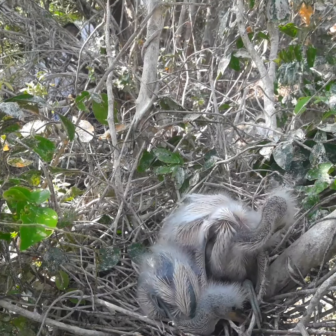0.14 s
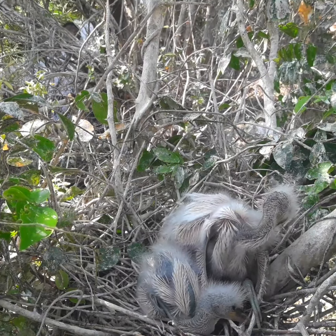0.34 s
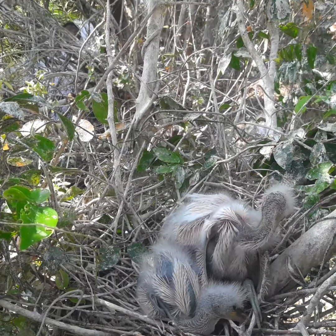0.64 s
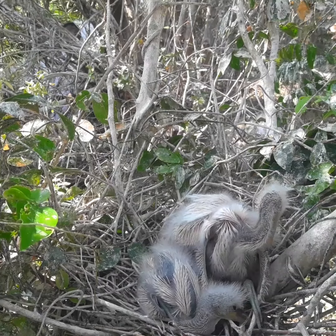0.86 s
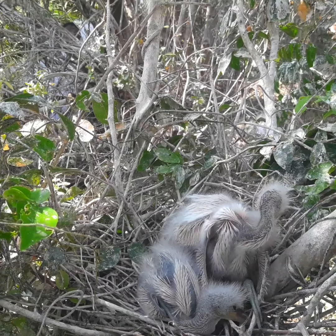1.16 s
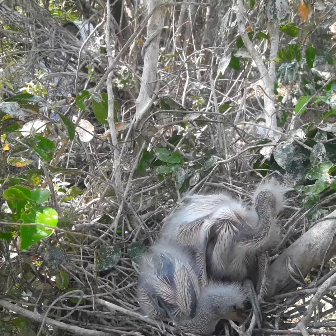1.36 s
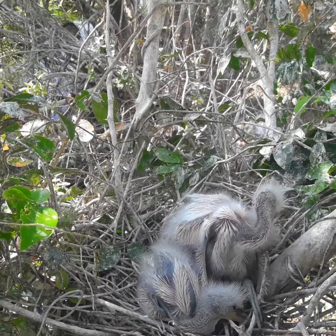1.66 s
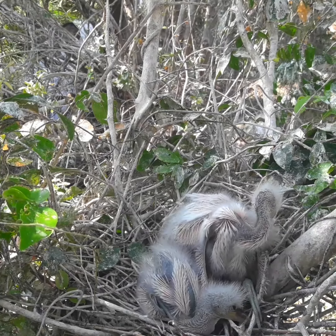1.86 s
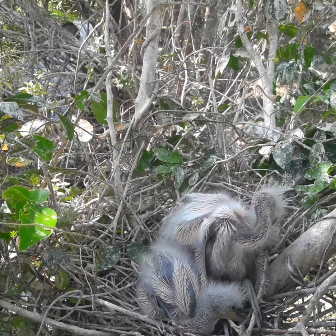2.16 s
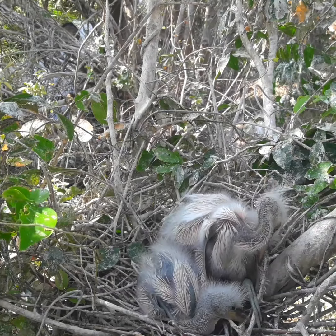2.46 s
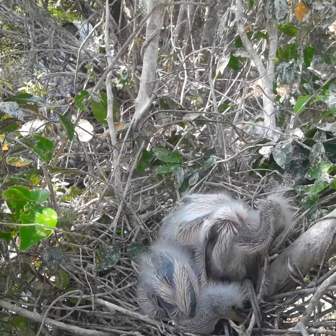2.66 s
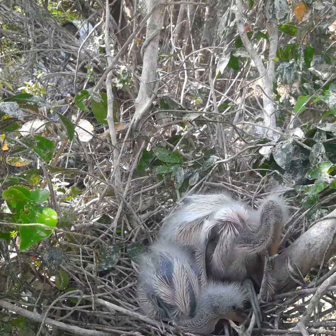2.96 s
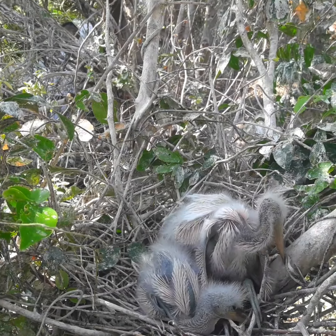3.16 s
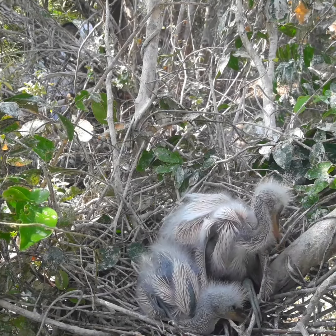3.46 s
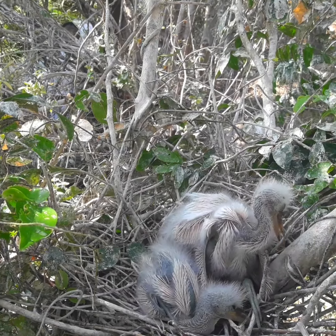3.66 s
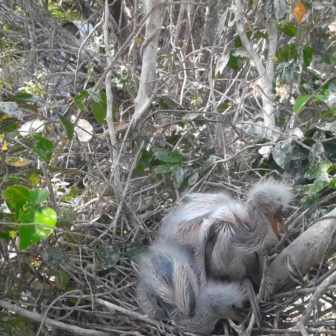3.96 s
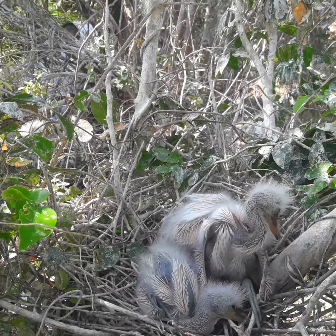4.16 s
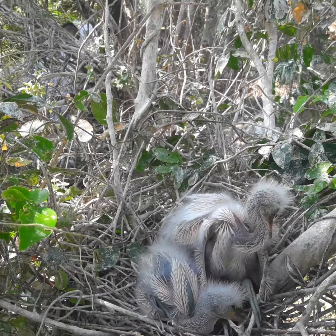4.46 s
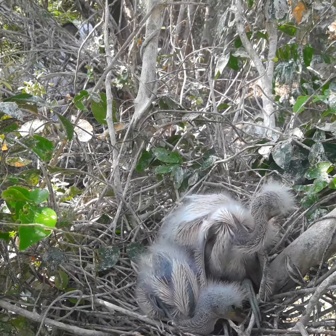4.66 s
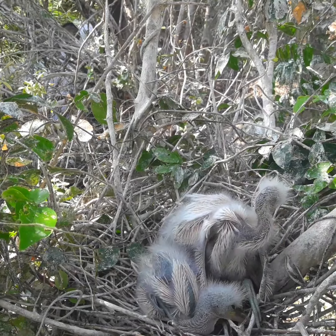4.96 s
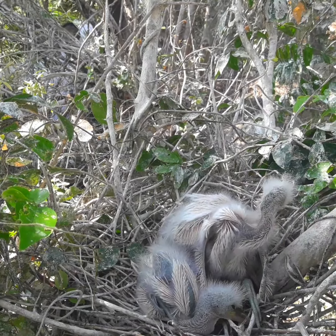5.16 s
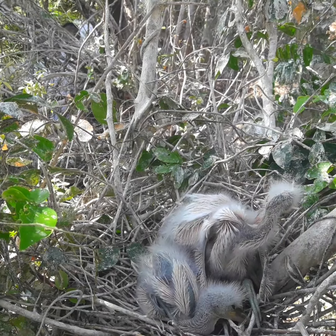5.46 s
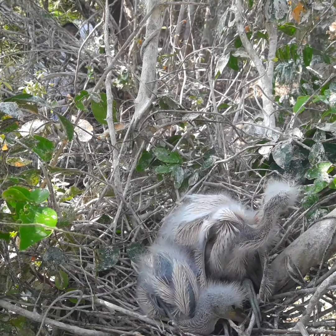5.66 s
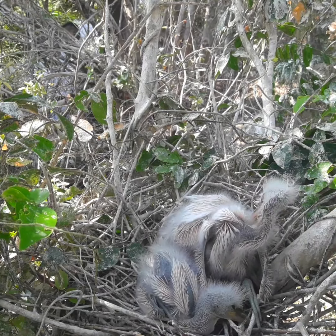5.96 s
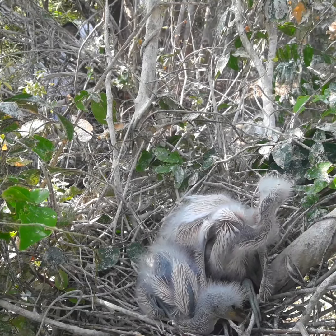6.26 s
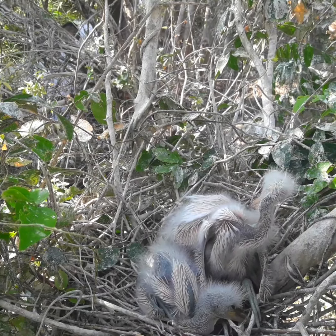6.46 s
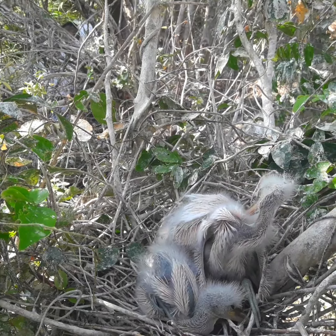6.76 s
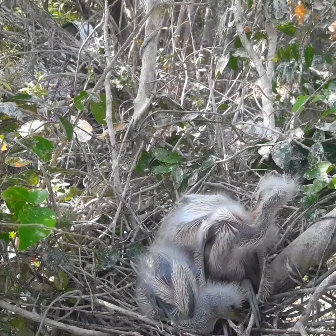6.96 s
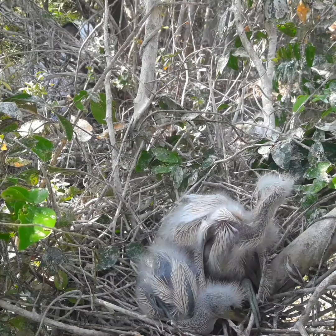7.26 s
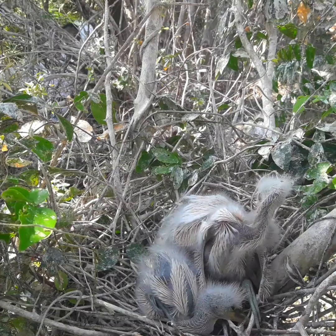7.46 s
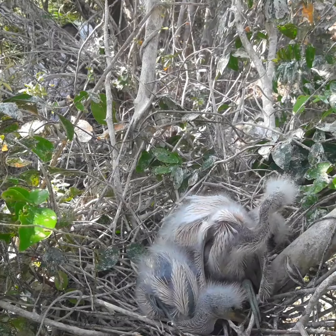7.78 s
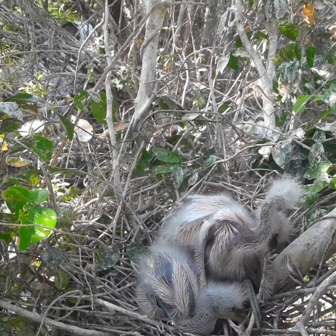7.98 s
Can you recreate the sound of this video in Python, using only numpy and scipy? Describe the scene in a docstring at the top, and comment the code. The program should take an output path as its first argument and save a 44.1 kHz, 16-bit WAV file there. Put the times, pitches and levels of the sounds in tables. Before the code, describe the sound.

A wading-bird colony in dense bushes, heard outdoors in mono for about 8 seconds. From 0 s near chicks beg with harsh, very short chacks, dry and clicking, at several pitches, many ending in a thin nearly pure squeal. They come thickly, around ten a second, until about 1.3 s, then more loosely, around four to six a second. Farther nests chatter without pause behind, dipping briefly near 1.9 and 3.4 s. A soft low rumble swells around 1.2 s, then sinks away. A very faint hum touches 3.9 s and another, lower, runs from 4.6 to 6.5 s, with a quiet falling squawk at 5.6 s. From about 6.2 s the chacks gain clear squeals and from 6.9 s one eager chick repeats strongly about every quarter second, while faint rough adult croaks sound from 7.1 s to the end. Twigs scatter the calls briefly; airy noise remains throughout.

```python
"""From the first moment wading-bird chicks beg in a bush colony: short harsh chacks ending in thin squeals.
Each chack is a rough voice ringing a throat; each squeal is an almost pure tone.
Farther nests chatter behind them throughout, over outdoor noise and a swelling low rumble.
Faint hums come midway, with a falling squawk during the second; near the end an adult croaks,
a rough voice in a wide throat."""
import sys
import numpy as np
from scipy import signal
from scipy.io import wavfile
from scipy.ndimage import uniform_filter1d

SR = 44100
rng = np.random.default_rng(int(sys.argv[2]) if len(sys.argv) > 2 else 0)


def dump(signal):
    """Clip the signal to [-1, 1] and save it as 16-bit WAV at the path in sys.argv[1]."""
    limited = np.clip(np.atleast_2d(signal).T, -1, 1)
    pcm = np.round(limited * 32767).astype(np.int16)
    wavfile.write(sys.argv[1], SR, pcm)


N = 358091  # length of the scene in samples


def amp(db):
    """Turn decibels into a plain multiplier."""
    return 10 ** (np.asarray(db) / 20)


def evened(x):
    """Bring a sound to an average (RMS) level of 1."""
    return x / np.sqrt(np.mean(x ** 2) + 1e-20)


def read(points, hz):
    """Read a curve of (hz, value) points, with pitch on a logarithmic scale."""
    f, value = np.transpose(points)
    return np.interp(np.log(hz + 1), np.log(f + 1), value)


def add(mix, s, sound):
    """Lay a sound into the mix at s seconds, cut off at the end of the mix."""
    part = mix[round(s * SR):][:len(sound)]
    part += sound[:len(part)]


# The near chacks, with levels before the beak colours them. Columns: start_s, chick (name), level_db,
# length_s, pitch_hz (at the start), first_throat_hz (sounds 5% lower, then climbs), second_throat_hz,
# squeal_hz (at its loudest), squeal_db (against the chack at full level)
CHACKS = [(0, "slow", -34.5, 0.013, 637, 2700, 4200, 4200, -12),
          (0.0196, "sharp", -27, 0.016, 690, 2900, 4050, 3230, -15),
          (0.114, "peep", -35.5, 0.01, 823, 2670, 4160, 3550, -10),
          (.138, "shrill", -26, .011, 800, 2230, 3670, 3420, -26),
          (0.2122, "sharp", -40.5, 0.016, 627, 2390, 3340, 3101, -27),
          (0.2565, "sharp", -26.5, 0.0092, 671, 2650, 3700, 3200, -10.5),
          (0.354, "peep", -37.5, .02, 856, 2520, 3800, 3451, -18),
          (0.427, "slow", -25.5, 0.026, 571, 2460, 3700, 3795, -22),
          (0.491, "sharp", -27, 0.015, 672, 2780, 3940, 3110, -18.5),
          (0.5954, "peep", -38, 0.014, 866, 2580, 4040, 2568, -10),
          (0.649, "shrill", -30.5, 0.038, 890, 2340, 4000, 2239, -9),
          (0.7396, "low", -26, 0.014, 514, 2550, 3650, 3569, -12),
          (0.847, "peep", -35, 0.017, 900, 2680, 4200, 2600, -24),
          (0.883, "grunt", -29, 0.023, 591, 2130, 4060, 2159, -11.5),
          (1.018, "sharp", -30, 0.019, 661, 2780, 3770, 3500, -24),
          (1.037, "low", -25, 0.013, 588, 2560, 3740, 3575, -23),
          (1.104, "shrill", -30, 0.04, 997, 2230, 3440, 3010, -16),
          (1.225, "peep", -42, 0.033, 834, 2560, 3400, 3280, 0),
          (1.26, "sharp", -27, .012, 682, 2570, 3540, 3040, -19),
          (1.316, "low", -24, 0.017, 516, 2570, 3800, 3540, -30),
          (1.5017, "sharp", -25, 0.021, 691, 2390, 3900, 3050, -18),
          (1.5993, "low", -25.5, 0.015, 565, 2400, 3700, 3670, -23),
          (1.7542, "sharp", -27.5, 0.027, 697, 2630, 3450, 2955, -13),
          (1.985, "sharp", -32, .024, 680, 2610, 3760, 4030, -17),
          (2.2047, "slow", -30, 0.022, 649, 2630, 5630, 3870, -10),
          (2.4501, "low", -28.5, 0.018, 484, 2600, 4040, 4640, -31),
          (2.5878, "shrill", -30.5, .024, 1020, 2400, 5050, 3133, -14),
          (2.7074, "sharp", -29, 0.0074, 689, 2700, 3800, 3182, -29),
          (2.7401, "low", -29.5, 0.016, 520, 3080, 3940, 3758, -22),
          (2.8401, "slow", -29.5, 0.033, 652, 2340, 3200, 3100, -17),
          (2.989, "sharp", -29.5, 0.014, 698, 2600, 3750, 3040, -32),
          (3.0206, "low", -29.5, 0.018, 575, 2120, 3760, 3770, -13),
          (3.0754, "slow", -28, 0.03, 628, 3020, 3350, 3230, -4.5),
          (3.2893, "slow", -28, 0.034, 640, 2900, 3370, 3311, -7),
          (3.3277, "shrill", -27.5, 0.015, 786, 2330, 3700, 3090, -12),
          (3.5787, "shrill", -27, 0.029, 847, 2480, 3600, 3844, -10),
          (3.7417, "shrill", -31, 0.021, 1051, 2940, 3400, 3240, -10),
          (3.846, "sharp", -26.5, 0.038, 692, 2780, 3680, 3290, -12.5),
          (3.994, "low", -29, 0.043, 517, 2320, 3300, 2930, -14),
          (4.1334, "sharp", -27, 0.016, 674, 2740, 4600, 3042, -11),
          (4.2305, "slow", -28, 0.04, 610, 2900, 3420, 3050, -16),
          (4.4083, "peep", -37, 0.029, 729, 2760, 4540, 2740, -14),
          (4.4548, "slow", -28, 0.035, 632, 2970, 3360, 2939, -16),
          (4.635, "shrill", -29.5, 0.01, 1110, 1800, 3650, 3220, -28),
          (4.8248, "low", -29.5, .019, 532, 2260, 3500, 3208, -13),
          (4.9667, "low", -26.5, 0.0091, 483, 2220, 4460, 4350, -33),
          (5.058, "low", -30, .028, 551.6, 2200, 3170, 2907, -24),
          (5.265, "low", -27, 0.05, 430.6, 2180, 3610, 3100, -30),
          (5.3534, "low", -34, 0.003, 431, 3220, 3370, 3240, -15),
          (5.5221, "slow", -29, 0.029, 600, 2770, 3440, 3203, -15),
          (5.673, "peep", -38, 0.0072, 1060, 3090, 4340, 4900, -27),
          (5.8073, "peep", -39, 0.0088, 767, 3100, 3800, 4064, -17),
          (5.944, "low", -34.5, 0.015, 485, 2280, 3270, 3381, -11),
          (6.19, "slow", -27.5, 0.032, 722, 1950, 3770, 2920, -7.5),
          (6.433, "slow", -26.5, 0.035, 699, 2680, 3800, 2730, -5.5),
          (6.654, "grunt", -30.4, 0.021, 530, 2600, 3730, 2659, -13),
          (6.6867, "eager", -28, 0.035, 679, 2120, 3900, 2977, -8),
          (6.9246, "eager", -25.5, 0.022, 689, 2300, 4020, 3054, -3.5),
          (6.96, "peep", -31, 0.009, 854, 3060, 4050, 3500, -14),
          (7.0477, "grunt", -33, 0.012, 572, 2150, 2840, 2083, -14),
          (7.117, "peep", -43, 0.0058, 800, 3500, 4100, 3550, -21),
          (7.146, "peep", -44, 0.047, 894, 2410, 3300, 3500, -19),
          (7.15, "low", -32, .002, 570, 2030, 5200, 3500, -30),
          (7.161, "eager", -23, .027, 687, 2350, 4060, 3036, -6.5),
          (7.3033, "grunt", -30, 0.02, 635.5, 2210, 2800, 2480, -16),
          (7.3973, "eager", -26, .024, 740, 2230, 4620, 3138, -0.5),
          (7.5226, "grunt", -29.5, 0.023, 608, 2350, 3000, 2514, -6),
          (7.6147, "eager", -25.5, 0.027, 696, 2420, 4080, 3160, -4),
          (7.704, "peep", -34, 0.0093, 856, 3180, 4200, 3530, -10),
          (7.777, "low", -35, 0.015, 548, 1880, 3270, 4581, -25),
          (7.819, "eager", -27.5, 0.032, 725, 2280, 4290, 3165, -1.5),
          (7.9622, "shrill", -30, 0.03, 525, 2400, 3500, 4200, -17),
          (8.02, "eager", -28.5, 0.032, 702, 2210, 4010, 3004, -3)]
# The chicks in the near nests, by name. Columns: rising (share of length_s, 0-1), roughness (0-1),
# second_throat_db (over the first), overtone_db (peak after the squeal, over squeal_db)
VOICES = {"sharp": (.03, .6, 1, 1), "eager": (.03, .42, 6, -8), "low": (.18, .7, 3, -20),
          "slow": (.36, .65, 2, -20), "grunt": (.4, .7, 0, -20), "peep": (.25, .18, 8, -4),
          "shrill": (.3, .87, 3, -20)}


def chicks():
    """Each near chick keeps its attack, roughness and balance; its neck is stretched differently each call."""
    out = np.zeros(N)
    for s, chick, db, length, pitch_hz, low_hz, high_hz, squeal_hz, squeal_db in CHACKS:
        rising, rough, high_db, overtone_db = VOICES[chick]
        call = chack(db, rising * length, length, pitch_hz, rough, low_hz, high_hz, high_db,
                     squeal_hz, squeal_db, overtone_db)
        add(out, s, call)
    return beak(out)


def chack(db, rise, length, pitch_hz, rough, low_hz, high_hz, high_db, squeal_hz, squeal_db, overtone_db=-6):
    """A rising, partly rough voice rings the windpipe; then it jumps to a near-pure squeal."""
    t = np.arange(0, .08, 1 / SR)
    glide = 4 if pitch_hz < 800 else .5  # the high voices nearly hold their pitch
    bend = 1 + glide * t * (.5 + 30 * np.minimum(t, .03))  # the rise steepens at first
    hz = pitch_hz * bend
    drive = membrane(hz, .012 + .06 * rough ** 2, rough * (.12 + 24 * t))  # roughness grows
    opening = 1 + 0.28 * np.clip(t / length, 0, 1.3) ** 2  # the neck shortens: first resonance climbs

    def ring(ring_hz, width):
        """Two resonances in a row, so the peak has steeper sides."""
        return resonate(resonate(drive, ring_hz, width), ring_hz, 2 * width)

    voice = ring(low_hz * .95 * opening, 350)
    voice -= amp(high_db) * ring(high_hz, 440)
    voice += amp(.5 * high_db - 5.5) * ring(4940, 1300)
    voice -= amp(.5 * high_db - 2.0) * ring(6880, 1170)
    voice += amp(-8.0) * membrane(hz, 0.033 * rough, 1.08 * rough)  # some sound escapes the windpipe
    voice += amp(-7) * ring(hz, 570)  # the chest thumps
    # a steady fade after the rise, much faster once the call is over
    shape_db = -150. * np.maximum(t - rise, 0) - 1240.0 * np.maximum(t - 1.11 * length, 0)
    fade_in = np.clip(t / max(rise, 1e-4), 0, 1) ** 0.7
    voice = evened(voice) * fade_in * amp(shape_db)

    late = t - 0.67 * length - .011  # time counted from the squeal's loudest moment
    turn = 2 * np.pi * (squeal_hz * (t + 1.63 * late ** 2) + rng.random())
    squeal = amp(squeal_db + 3) * np.exp(-(late / .007) ** 2) * np.sin(turn)
    # the next overtone takes over
    overtone_swell = np.exp(-((late - .012) / 0.0072) ** 2)
    squeal += amp(squeal_db + overtone_db) * overtone_swell * np.sin(turn * 4 / 3)
    return amp(db) * (voice + squeal)


def membrane(hz, jitter, rough):
    """Voice membranes snap shut unevenly, with a puff of noise after each snap."""
    wander = evened(uniform_filter1d(rng.standard_normal(len(hz)), size=60))
    turns = np.cumsum(hz * (1 + jitter * wander)) / SR - .02
    top = int(16000 / hz.min())  # number of overtones, all in phase
    snaps = np.sin((2 * top + 1) * np.pi * turns) / np.sin(np.pi * turns) - 1
    # uneven timing goes with uneven size
    sizes = amp((1 + 25 * jitter) * rng.standard_normal(len(hz)))
    snaps *= sizes[(turns + .5).astype(int)]
    puffs = (0.13 + np.exp(-(turns % 1) / 0.99)) * rng.standard_normal(len(hz))
    rough = np.clip(rough, 0, 1)
    return (1 - rough) * evened(snaps) + rough * evened(puffs)


def resonate(x, hz, width):
    """A hollow rings at its own pitch: one resonance of gain 1 that follows the curve hz."""
    turn = np.exp(2j * np.pi * np.cumsum(hz * np.ones(len(x))) / SR)
    r = np.exp(-np.pi * width / SR)  # a wider resonance dies away faster
    return 2 * (turn * signal.lfilter([1 - r], [1, -r], x / turn)).real


# Tone colour shared by the chicks' calls, from beak and microphone. Columns: pitch_hz, gain_db
THROAT = [(250, -9.5), (600, -9.5), (1600, 2), (2100, 7), (7000, -4), (7500, -8.5), (8300, -14),
          (12000, -13), (15500, -22.5)]


def beak(x):
    """The shared colour as a filter that only acts forward in time."""
    gain_db = read(THROAT, np.fft.rfftfreq(1024, 1 / SR))
    return signal.oaconvolve(x, causal(gain_db))[:len(x)]


def causal(gain_db):
    """Minimum-phase impulse response (earliest possible energy) for gains on a 1024-point grid."""
    log_gain = np.log(amp(np.r_[gain_db, gain_db[-2:0:-1]]))
    return np.fft.ifft(np.exp(signal.hilbert(log_gain).conj())).real[:400]


# How busy the far nests are; air() uses it too. Columns: time_s, level_db (before the final mix)
COLONY = [(0.0, -43.5), (1.06, -41.5), (1.82, -40), (1.9, -53), (2.0, -41), (3.3, -39.5), (3.42, -47.5),
          (3.7, -40.5), (5.5, -39.5), (6.8, -41), (7.3, -40.5), (8.12, -37)]


def colony(count=200):
    """Many far chicks call at random moments, each with a chance size, pitch, roughness and throat."""
    out = np.zeros(N)
    for s, size, a, b, c, d in rng.random((count, 6)):
        call = chack(db=7 * size, rise=0.005, length=0.02 + 0.015 * a, pitch_hz=500 + 450 * b,
                     rough=0.33 + 0.58 * c, low_hz=2100 + 900 * d, high_hz=3300 + 1300 * a,
                     high_db=26.0 * c - 7., squeal_hz=2300 + 2000 * d, squeal_db=-29.0)
        add(out, s * N / SR, call)
    s, db = np.transpose(COLONY)
    return evened(beak(out)) * amp(np.interp(np.arange(N) / SR, s, db))


# Adult croaks. Columns: loudest_s, length_s, level_db (before the swell shapes it),
# start_throat_hz, end_throat_hz
CROAKS = [(7.155, .17, -51, 860, 890), (7.47, .24, -53, 870, 1010), (7.715, 0.13, -51, 790, 1150),
          (7.82, .1, -43.5, 1580, 970), (8.11, .2, -50, 850, 1090)]
CROAK_SWELL, CROAK_ENDS_DB = .45, -16  # share of a croak before its loudest moment; both ends, dB
SQUAWK_S, SQUAWK_LENGTH_S = 5.585, .105  # the short low squawk: start and length, s
SQUAWK_DB, SQUAWK_FADE_DB = -49, -110  # level before its fade, dB; fade, dB per s
SQUAWK_HZ, SQUAWK_END_HZ, SQUAWK_FALL_S = 290, 231.6, 0.054  # falls from, towards; time constant, s


def adults():
    """Slow rough membranes ring a wide throat in croaks; one squawk falls in pitch."""
    out = np.zeros(N)
    for s, length, db, start_hz, end_hz in CROAKS:
        u = np.arange(0, 1, 1 / SR / length)  # 0 to 1 through the croak
        hz = start_hz + (end_hz - start_hz) * u
        shape_db = np.interp(u, [0, CROAK_SWELL, 1], [CROAK_ENDS_DB, 0, CROAK_ENDS_DB])
        drive = membrane(np.full(len(hz), 150.), 0.026, 0.93)
        voice = resonate(resonate(drive, hz, 170), hz, 230)
        voice += 0.52 * resonate(resonate(drive, 0.567 * hz, 140), 0.513 * hz, 170)
        croak = evened(voice) * amp(db + shape_db) * signal.windows.tukey(len(hz), .2)
        add(out, s - CROAK_SWELL * length, croak)

    t = np.arange(0, SQUAWK_LENGTH_S, 1 / SR)
    hz = SQUAWK_END_HZ + (SQUAWK_HZ - SQUAWK_END_HZ) * np.exp(-t / SQUAWK_FALL_S)
    drive = membrane(hz, 0.0057, 0.6)
    voice = resonate(drive, 3530, 330)
    voice += .5 * resonate(drive, 1160, 630)
    voice += 0.18 * resonate(drive, 1500, 400)
    squawk = evened(voice) * amp(SQUAWK_DB + SQUAWK_FADE_DB * t) * signal.windows.tukey(len(hz), .3)
    add(out, SQUAWK_S, squawk)
    return out


def bushes(x, t60=0.14):
    """Twigs and leaves scatter the calls: sparse taps of random sign, down 60 dB after t60 seconds."""
    taps = np.zeros(SR // 2)
    at = np.arange(40, len(taps) - 20, 20)
    taps[at + rng.integers(0, 20, at.shape)] = rng.choice([-1., 1.], at.shape)
    taps *= amp(-60 * np.arange(len(taps)) / SR / t60)
    return signal.oaconvolve(x, taps / np.linalg.norm(taps))[:N]


# Tone balance of the outdoor noise. Columns: pitch_hz, relative_db (per Hz)
AIR = [(25, -30), (43, -1), (190, 7), (575, 4), (936, 2), (1260, -1), (3340, 0.5), (6740, -5.5),
       (8360, -19), (14800, -22.5), (16000, -21)]
AIR_DB = -47  # level of the whole noise
# The far rumble. Columns: time_s, level_db
RUMBLE = [(0.0, -54.5), (1.08, -58), (1.22, -48), (1.29, -52), (2.83, -60), (6.9, -59), (8.12, -55)]
# Faint hums. Columns: pitch_hz, start_s, end_s, level_db (before fading in and out)
HUMS = [(186, 4.55, 6.55, -62), (301, 3.84, 4.06, -57)]


def air():
    """Noise made patchy in time and pitch, a swelling band of low noise, and narrow noise as wavering hums."""
    frames, hz = N // 256 + 5, np.fft.rfftfreq(1024, 1 / SR)
    a, b, patches = rng.standard_normal((frames, 513, 3)).T
    patches = uniform_filter1d(patches, size=10, axis=0)  # smooth over pitch
    patches = evened(uniform_filter1d(patches, size=14, axis=1))  # smooth over time
    # the farthest chatter blurs into the treble hiss
    busy_db = np.interp(np.arange(frames) * 256 / SR, *np.transpose(COLONY))
    blur_db = .5 * np.outer(np.clip(hz / 1500, 0, 1), busy_db - busy_db.mean())
    spectrum = (a + 1j * b) * amp(read(AIR, hz)[:, None] + blur_db + 1.6 * patches)
    noise = signal.istft(spectrum, nperseg=1024, noverlap=768)[1][:N]
    out = amp(AIR_DB) * evened(noise)

    s, db = np.transpose(RUMBLE)
    low_band = signal.butter(2, [50, 140], "band", fs=SR, output="sos")
    rumble = signal.sosfilt(low_band, rng.standard_normal(N))
    out += evened(rumble) * amp(np.interp(np.arange(N) / SR, s, db))

    for hum_hz, start, end, db in HUMS:
        hum = resonate(rng.standard_normal(round((end - start) * SR)), hum_hz, 5.3)
        add(out, start, amp(db) * evened(hum) * signal.windows.tukey(len(hum), .3))
    return out


def scene():
    """Mix near chicks, far nests and adults with their scatter in the bushes, over the air."""
    near, far, old = chicks(), colony(), adults()
    scattered = bushes(amp(-7.0) * near + amp(-10.0) * far + amp(11.0) * old)
    return (near + amp(-8.5) * far + old + scattered + air())[None]


EDGE_HZ = 15900  # upper limit of the sound


def record(dry):
    """Bass roll-off of the microphone, then the treble limit."""
    dry = signal.sosfilt(signal.butter(2, 38, "high", fs=SR, output="sos"), dry)
    treble_limit = signal.firwin(511, EDGE_HZ, window=("kaiser", 9), fs=SR)
    return signal.oaconvolve(dry, treble_limit[None], "same")


dry = scene()
out = record(dry)
dump(out)
```